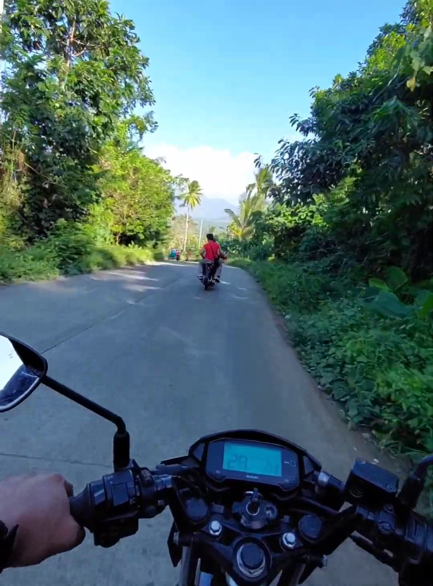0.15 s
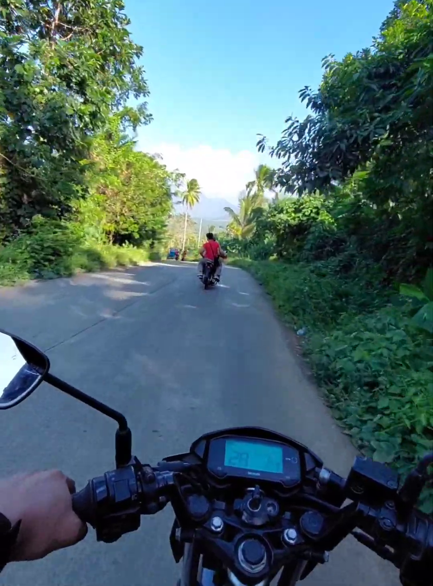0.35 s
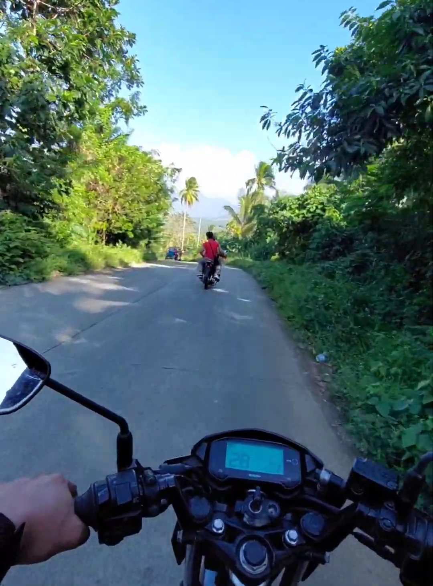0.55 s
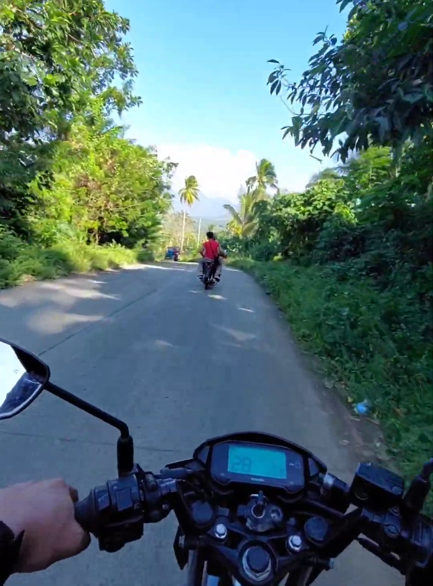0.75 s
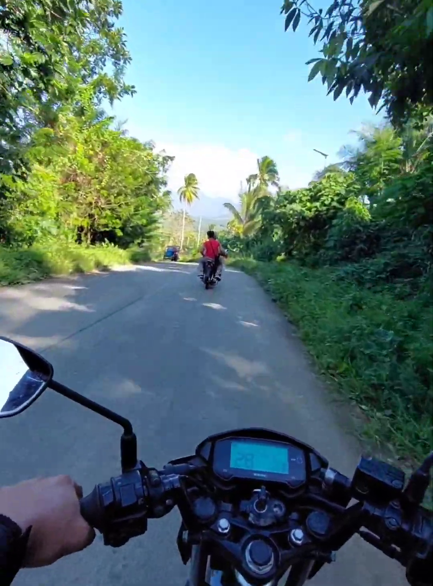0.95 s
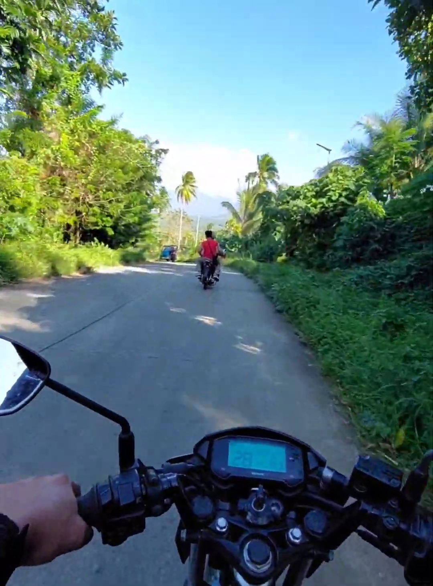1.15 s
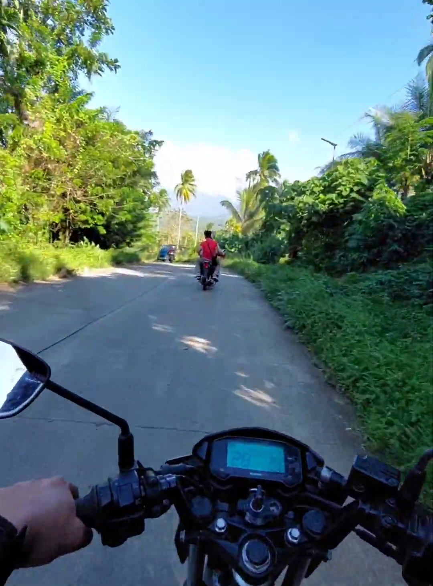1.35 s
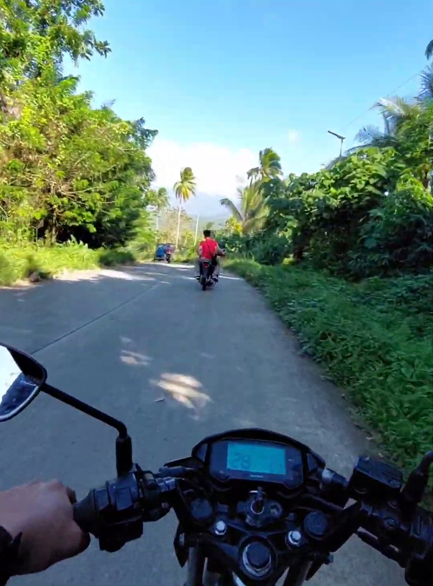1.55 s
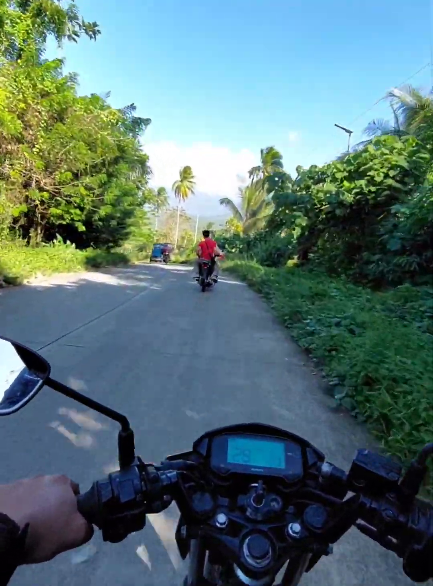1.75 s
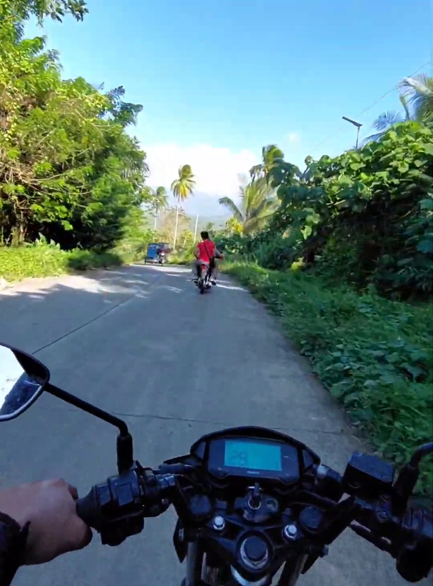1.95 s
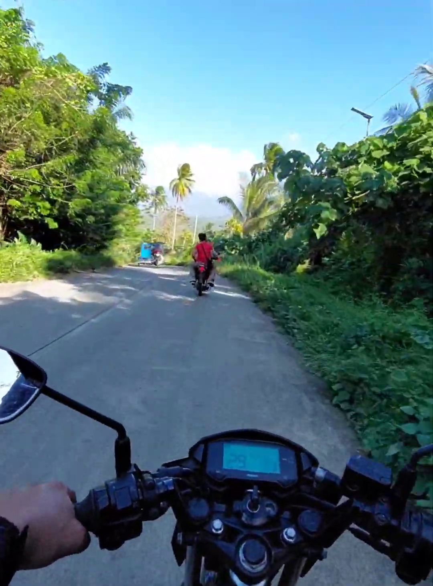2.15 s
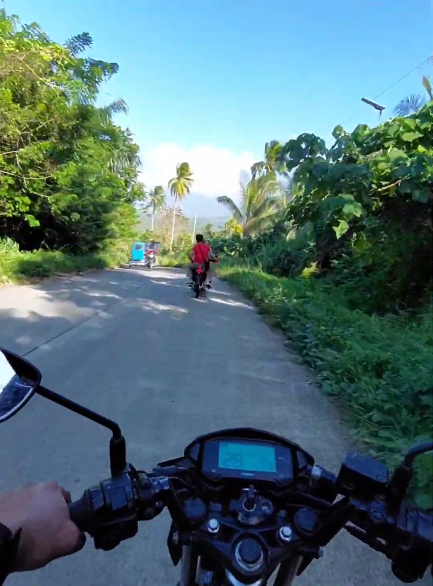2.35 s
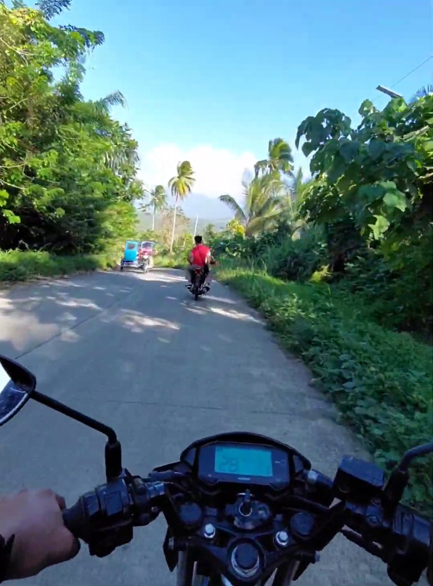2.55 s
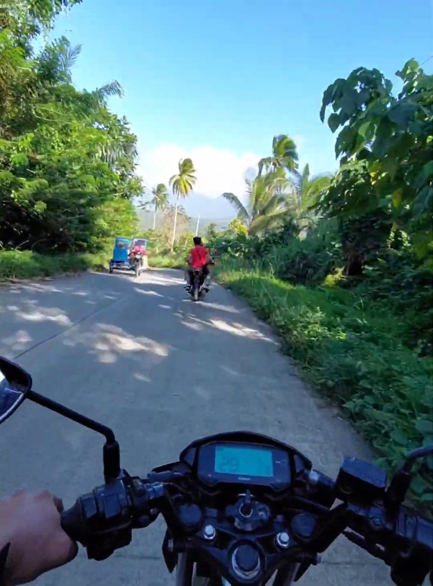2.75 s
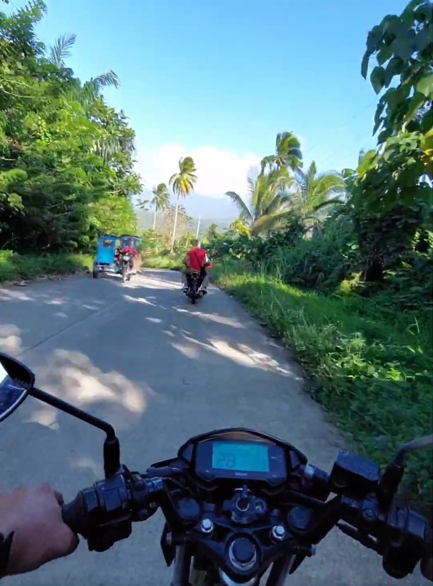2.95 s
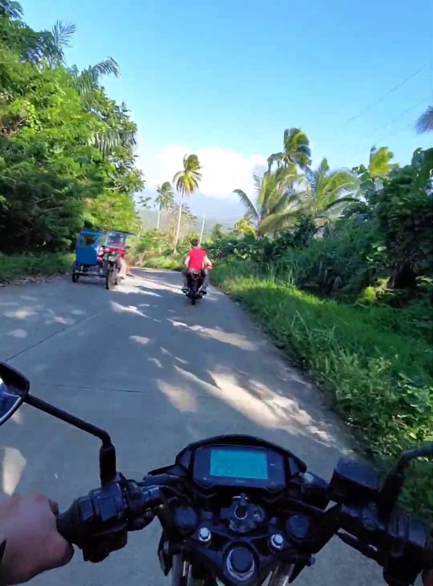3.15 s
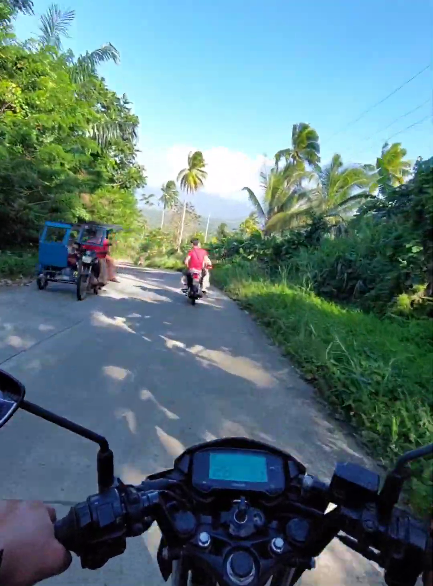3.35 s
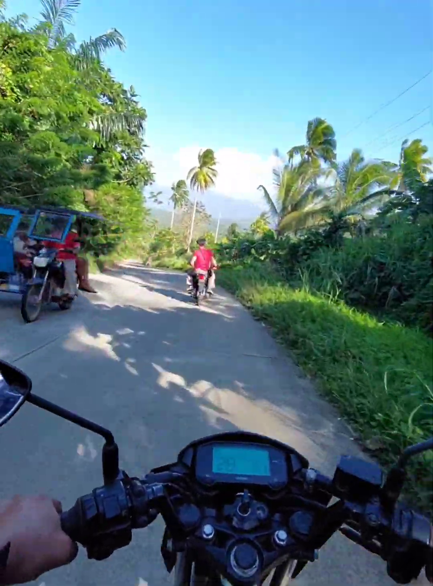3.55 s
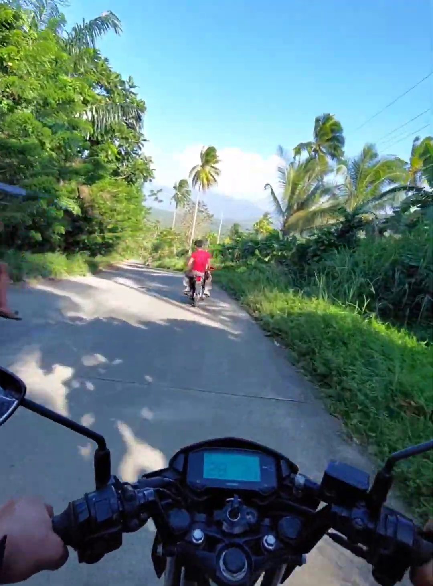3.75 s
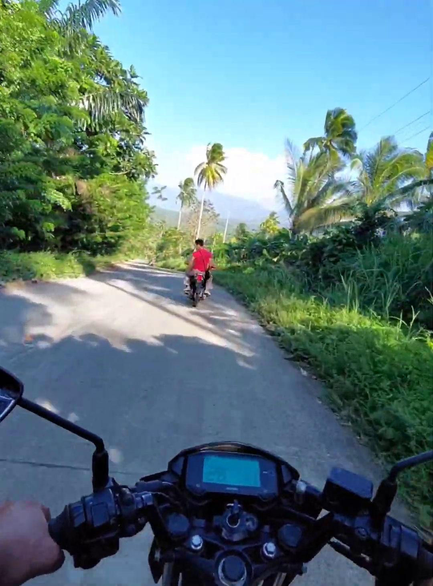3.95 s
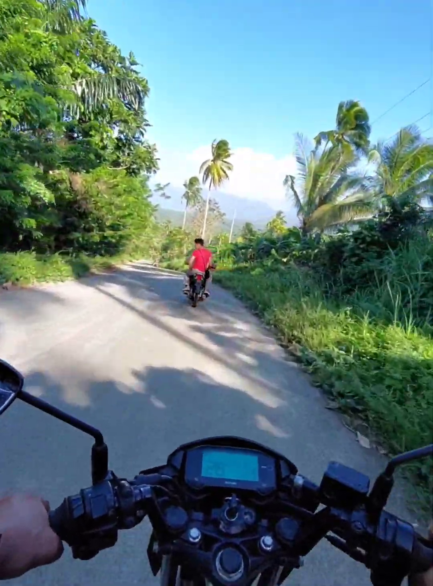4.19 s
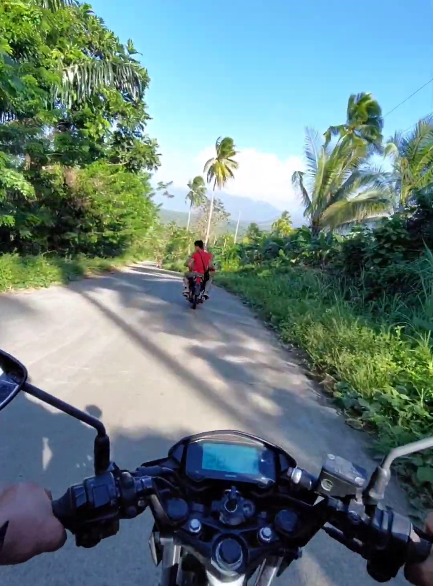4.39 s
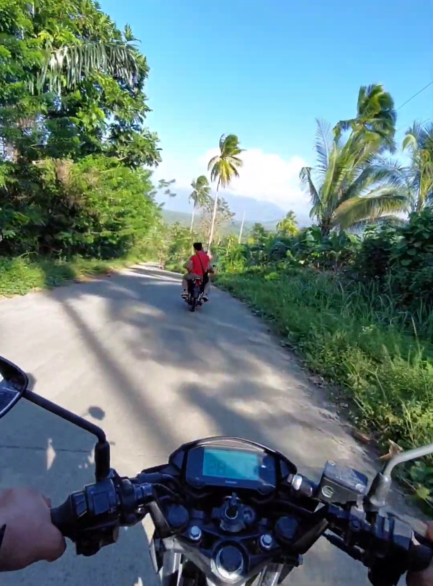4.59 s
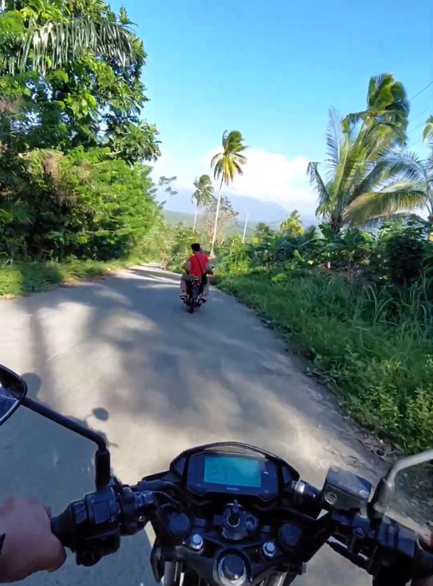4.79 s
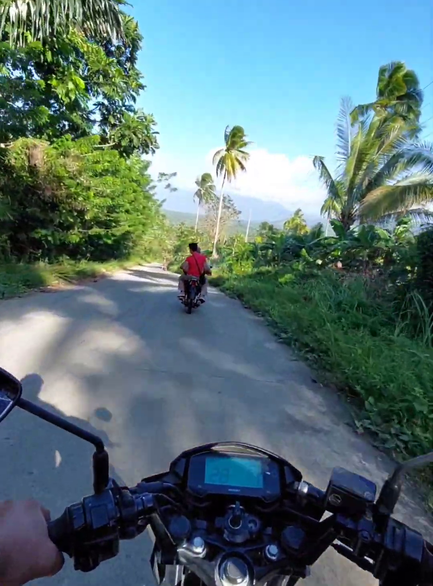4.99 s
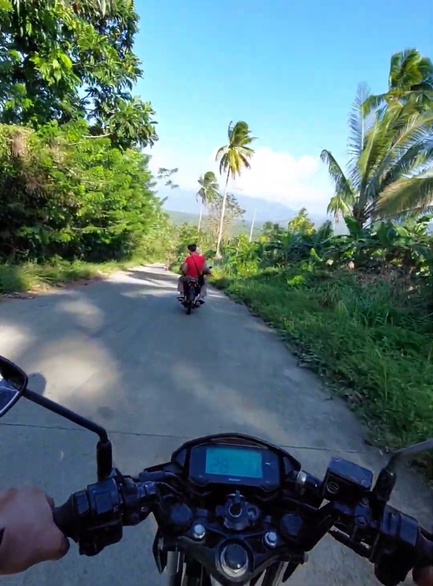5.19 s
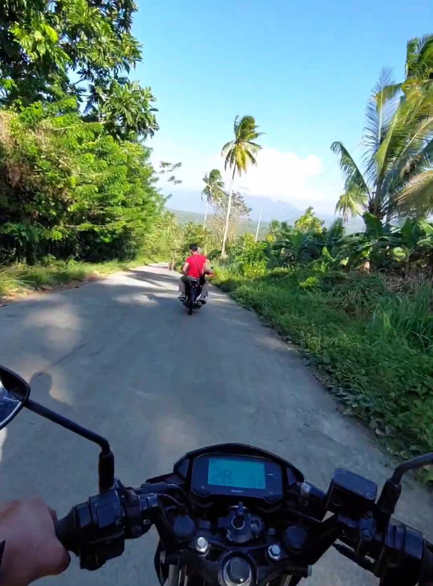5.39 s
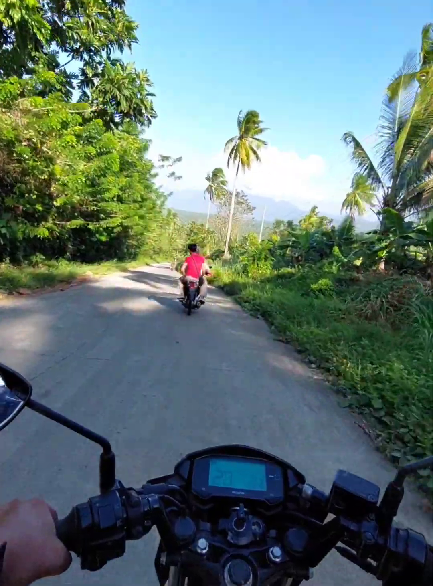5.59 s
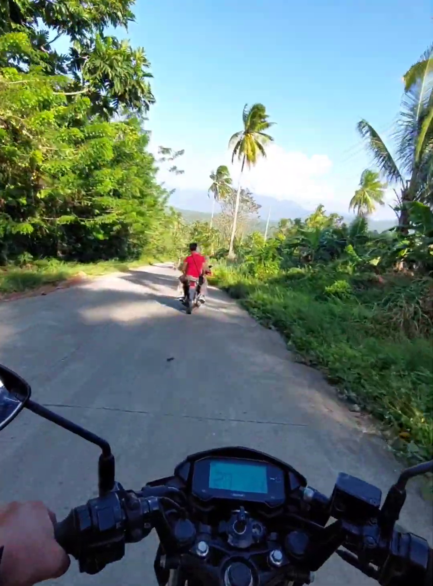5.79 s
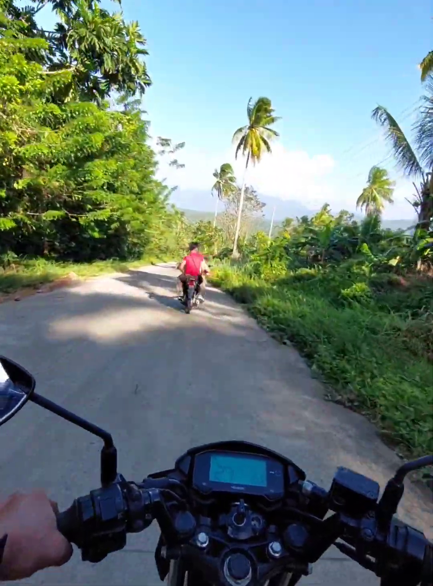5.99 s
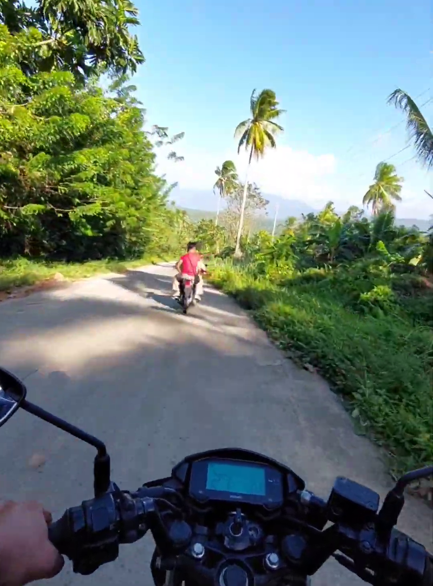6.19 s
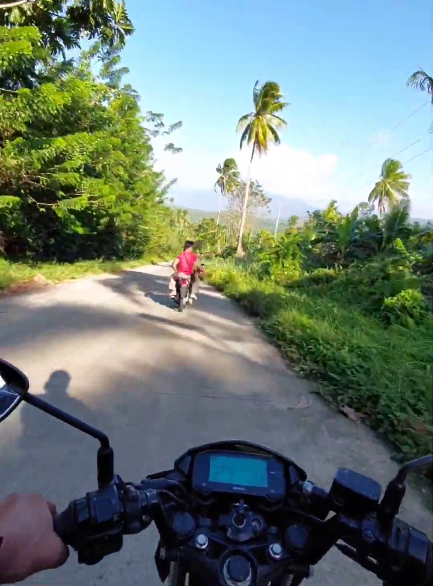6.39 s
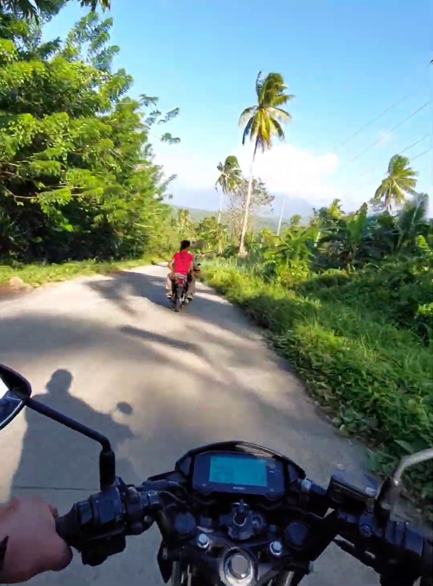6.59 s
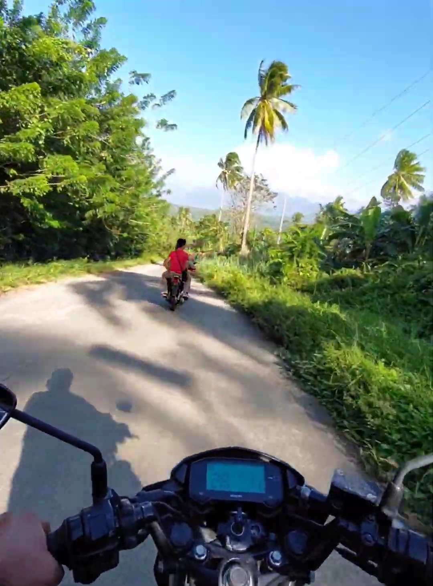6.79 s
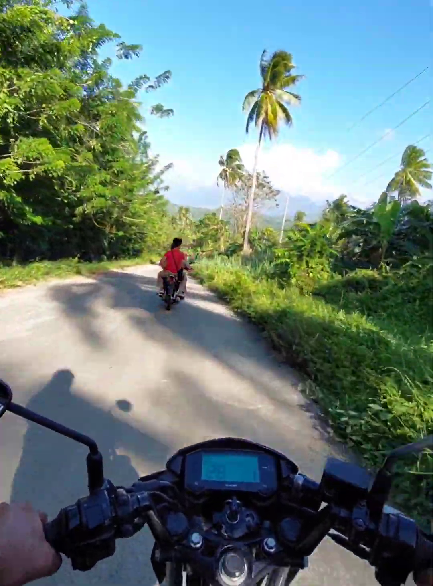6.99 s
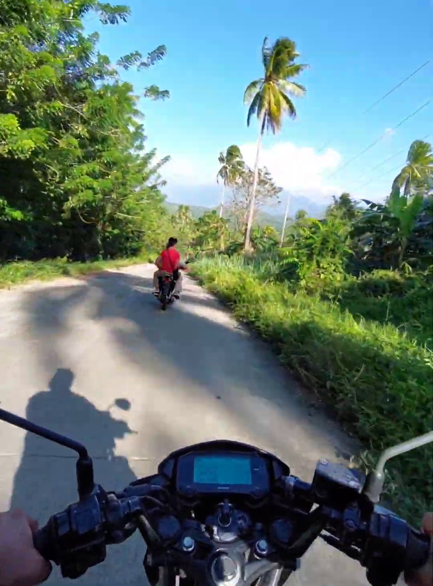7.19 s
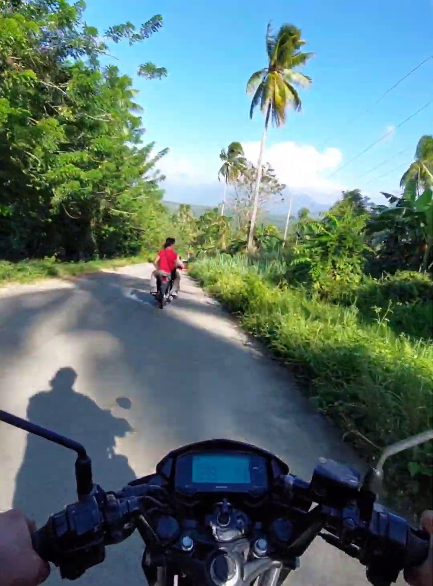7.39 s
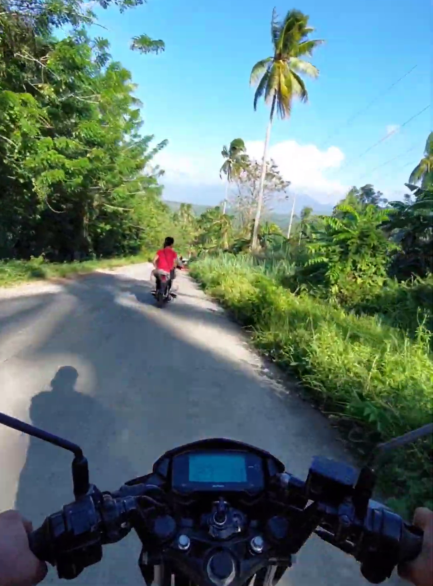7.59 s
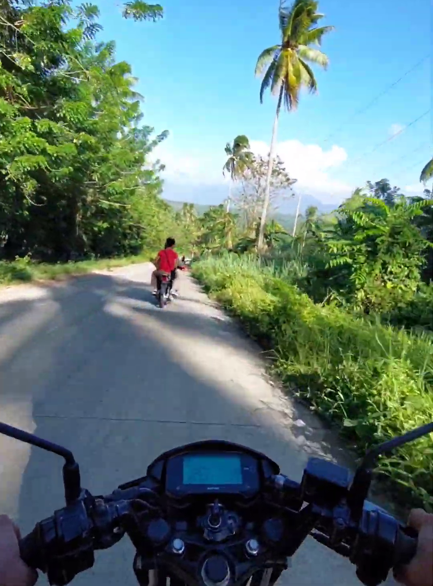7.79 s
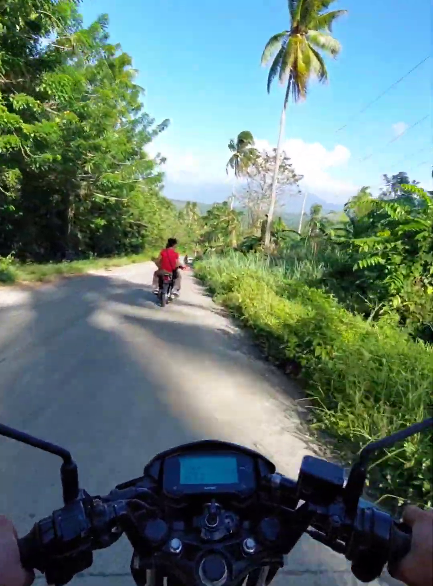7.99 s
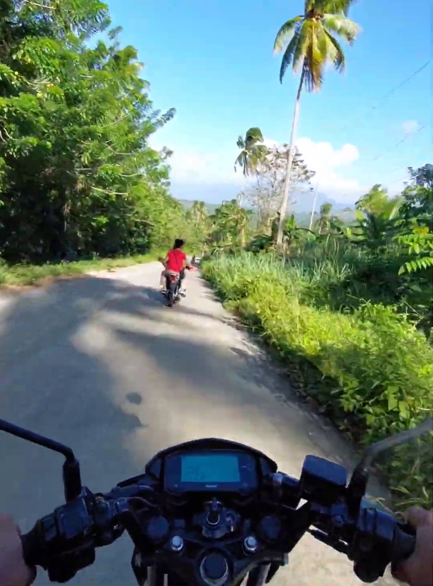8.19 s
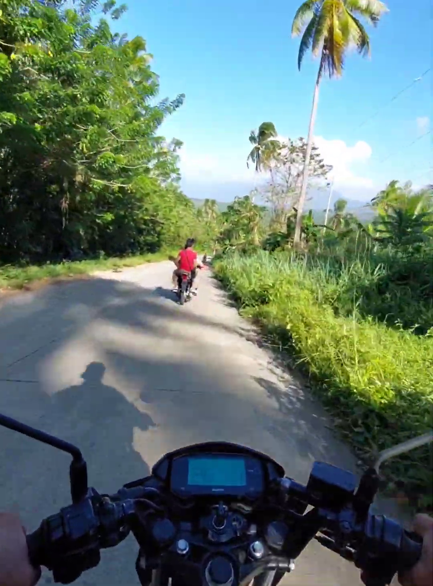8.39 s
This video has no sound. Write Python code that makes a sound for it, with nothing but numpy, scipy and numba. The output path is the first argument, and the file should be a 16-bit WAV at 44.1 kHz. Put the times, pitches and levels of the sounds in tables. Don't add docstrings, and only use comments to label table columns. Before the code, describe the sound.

Low, lumpy motorcycle thumping heard from the rear rider, with road-joint knocks and rattles, while an oncoming motor tricycle swells by and fades.

```python
import sys
import numpy as np
from scipy import signal
from scipy.io import wavfile
from scipy.ndimage import uniform_filter1d
from numba import njit

SR = 44100
rng = np.random.default_rng(int(sys.argv[2]) if len(sys.argv) > 2 else 0)


def amplitude_ratio(level_db):
    exponent = np.asarray(level_db, float) / 20
    return 10 ** exponent


def log_audio(samples):
    frames = np.atleast_2d(samples).T
    limited = np.clip(frames, -1, 1)
    pcm = np.round(limited * 32767).astype(np.int16)
    wavfile.write(sys.argv[1], SR, pcm)


N = 372195
T = np.arange(N) / SR
SLOW = T[::64]
BANDS_HZ = 14300 / 2 ** (np.arange(22)[::-1] / 2.5)
ZONE = np.digitize(BANDS_HZ, [950, 3000])

# time in seconds, firing rate in Hz.
OWN_RATE = [(-0.0004, 17.995), (0.4, 17.269), (0.8, 16.828), (1.4, 16.639), (2.4, 16.728), (3.2, 16.583),
            (4.2, 16.754), (5.2, 17.137), (6.0, 17.283), (6.8, 17.533), (7.5, 17.876), (8.0, 18.174),
            (8.44, 18.452)]
# time in seconds, firing rate in Hz.
AHEAD_RATE = [(-0.0083, 16.943), (1.0, 17.234), (2.0, 17.467), (2.3, 16.939), (2.8, 16.786), (3.3, 16.916),
              (4.3, 16.942), (4.9, 16.689), (5.3, 16.436), (5.7, 16.689), (6.3, 16.456), (6.7, 17.095),
              (7.1, 16.711), (7.4, 16.013), (7.8, 15.963), (8.1, 14.909), (8.44, 13.667)]
# time in seconds, exhaust level in dB, road level in dB.
RIDE_LEVELS = [(0, -15, -1.5), (.3, -14.5, 0.5), (.8, -13, 0.5), (1.25, -18, 1.5), (1.7, -18, 2), (2.2, -22, 2),
               (2.55, -32, 3), (2.75, -29.5, 0), (3.1, -28.5, 2.5), (4.2, -31.5, -1.5), (4.7, -33.5, -3),
               (5.1, -18.5, -3), (5.55, -22, -1.5), (5.9, -40, 0), (6.5, -13, 1), (7.0, -32, 0.5),
               (7.7, -32, 1.5), (8.44, -25.5, 2)]
# centre in Hz, width in Hz, level in dB.
OWN_PIPE = [(161, 39, 1), (76, 64, -3.5), (264, 230, -3), (368, 140, -0.5)]
# centre in Hz, width in Hz, level in dB.
AHEAD_PIPE = [(122, 82, 6.5), (77, 55, -4), (194, 620, -7)]
# centre in Hz, width in Hz, level in dB.
SILENCER = [(132.1, 34.8, -0.5), (75, 93, -3), (210, 130, -5)]
# time in seconds, peak in dB.
RICH_CHARGES = [(0.0024, -35), (0.0268, -16), (0.1, -17), (0.1464, -13), (0.2183, -6.5), (0.2646, -10),
                (0.3262, -9), (0.3829, -13), (0.4511, -11.5), (0.4978, -8), (0.568, -8.7), (0.615, -13),
                (0.6858, -8), (0.7332, -14), (0.759, -14), (0.7953, -8.5), (0.8245, -18), (0.85, -15),
                (0.8967, -19), (0.9272, -9.5), (0.9825, -10.5), (1.0352, -11), (1.0803, -20), (1.1057, -15.5),
                (1.1422, -11.3), (1.1966, -6.5), (1.2222, -8), (1.274, -13), (1.323, -12.3), (1.367, -11),
                (1.394, -12), (1.44, -9.5), (1.5122, -17), (1.545, -15.6), (1.5938, -12.6), (1.642, -19),
                (1.6629, -9.5), (1.7173, -13), (1.7746, -8), (1.814, -15), (1.8422, -8.5), (1.8822, -19),
                (1.908, -10), (2.008, -8), (2.062, -7.5), (2.1221, -8), (2.2457, -7.5), (2.3002, -7.5),
                (2.3607, -8.5), (2.4275, -14), (2.543, -5.5), (2.6022, -14.5), (2.7063, -17.3),
                (2.7338, -12.5), (2.8796, -13), (2.9355, -6.5), (2.9989, -16), (3.0619, -7.5),
                (3.0864, -16.2), (3.1126, -16),
                (3.1748, -9.5), (3.2446, -9.5), (3.3147, -10), (3.367, -7.5), (3.4186, -7.5), (4.7831, -8.5),
              (4.9805, -13), (5.0051, -14), (5.0497, -11.5), (5.0907, -11.5), (5.1575, -13.2),
              (5.2233, -15), (5.4564, -12), (5.509, -13.5), (5.573, -11.2), (5.6233, -9.5), (5.6966, -12),
              (5.8068, -11), (5.8852, -16.5), (5.9277, -8), (5.971, -14), (6.0427, -12), (6.1148, -7.5),
              (6.146, -17.6), (6.176, -12.5), (6.2024, -15), (6.2435, -16), (6.3174, -14), (6.354, -18.5),
              (6.4059, -19), (6.4627, -14), (6.4904, -15), (6.533, -10.5), (6.5913, -12), (6.732, -18),
              (6.7636, -12.5), (6.833, -12), (6.9604, -8.5), (7.121, -13.5), (7.2562, -13), (7.3042, -13),
              (7.3324, -16), (7.3729, -11), (7.4345, -12.5), (7.4614, -12.5), (7.572, -14), (7.748, -8),
              (7.816, -14), (7.9298, -10), (8.009, -11), (8.064, -10), (8.147, -9.5), (8.209, -10.5),
              (8.2852, -12), (8.3638, -9)]
# time in seconds, peak in dB.
SNAPS = [(0.1644, -15.5), (0.2934, -17), (0.3367, -12), (0.4542, -18), (0.631, -22), (0.757, -22),
         (0.9593, -19), (1.167, -21), (1.2869, -17), (1.467, -15), (1.5849, -15), (1.6458, -16),
         (1.7662, -14), (1.8286, -14), (1.954, -18), (2.0665, -20), (2.2442, -12.5), (2.3054, -27),
         (2.4867, -19.3), (2.5471, -19), (2.9047, -22), (2.918, -11.5), (2.938, -26), (3.0835, -16.5),
         (3.1601, -11.5), (3.272, -23), (3.29, -17), (3.3155, -16), (3.3426, -14.5), (3.3674, -18),
         (3.396, -17), (3.4218, -16.5), (3.448, -16), (3.498, -20), (5.169, -17), (6.0415, -16),
         (6.0987, -17), (6.1567, -13), (6.386, -25), (6.4437, -17), (6.5013, -18), (6.5203, -18),
         (6.539, -12.5), (6.5978, -17), (6.6172, -21), (6.7749, -14.5), (6.9585, -14), (7.019, -15.5),
         (7.1858, -19), (7.241, -17), (7.4092, -17), (7.8665, -16), (7.912, -15), (7.9676, -12),
         (8.2502, -18), (8.3026, -14)]
# frequency in Hz, density in dB per Hz.
ROAD = [(15, -45), (25, -7.5), (107, 5), (144, -12.5), (215, -10), (350, -17.5), (873, -34), (1240, -33),
        (1710, -32.5), (2070, -46.5), (2490, -45), (3740, -47), (5020, -39), (7940, -60.5), (15600, -51)]
# frequency in Hz, left-right likeness from 0 to 1.
LIKENESS = [(40, 1), (150, 0.57), (400, 0.53), (800, 0), (2500, 0), (7000, 0.16), (15000, 0)]
# centre in Hz, width in Hz, level
# over the rumble in dB, drift in dB/s.
HUMS = [(716.6, 39, -13, -0.58), (2418, 240, -27.5, -0.16), (6500, 3900, -35.5, 0.01),
        (1400, 130, -25, -0.1), (5200, 70, -50, 1), (340.5, 66, -11, 0.47), (873, 172, -13.5, -0.35),
        (494, 203, -10, -0.02), (12000, 2700, -37, 0.2)]
# start in seconds, length in seconds, gain in dB.
DUCKS = [
    (1.939, 0.056, -8.5),
    (2.583, 0.32, -5.5),
    (4.818, 0.17, -9),
    (5.231, 0.2, -18.5),
    (6.628, 0.073, -18),
    (7.0, 0.14, -3),
    (2.125, 0.096, -12),
    (6.848, 0.12, -5),
]
# time in seconds, peak in dB, brightness in Hz, T60 in seconds.
BUMPS = [(0.425, -26, 1210, 0.025), (1.444, -26.5, 1200, 0.049), (1.632, -28, 1200, .04),
         (1.903, -27.5, 1240, 0.043), (2.014, -25.5, 1200, 0.06), (2.641, -24.5, 1400, .05),
         (2.904, -32, 1190, .03), (4.779, -31, 1600, 0.03), (4.793, -32.5, 2110, 0.075),
         (5.007, -35, 1200, 0.023), (5.121, -24.5, 470, 0.14), (5.284, -24, 450, 0.28),
         (5.912, -37, 1200, 0.031), (6.401, -31, 1500, 0.036), (6.558, -37, 2500, 0.045),
         (6.609, -31, 2300, 0.049), (6.571, -34, 2400, 0.022), (6.621, -35, 2200, 0.03),
         (6.665, -40, 2400, 0.031), (6.695, -43, 3400, 0.063), (6.648, -28.5, 2460, 0.022),
         (6.9, -28, 1250, 0.026), (7.358, -37, 1200, 0.023), (5.312, -40.5, 5000, 0.067),
         (0.96, -21.5, 1190, 0.077), (1.131, -49, 1200, 0.079), (2.287, -28, 1180, 0.05),
         (2.733, -30.5, 1250, 0.28), (2.935, -23, 1510, 0.034), (4.808, -24.5, 1190, 0.097),
         (5.123, -33, 1170, 0.12), (5.182, -23, 880, 0.063), (5.279, -50, 700, 0.13),
         (5.312, -32, 1190, 0.12), (5.353, -20.5, 1140, 0.032), (5.335, -31, 1500, 0.033),
         (6.512, -24, 1130, 0.15), (6.544, -29.5, 1200, 0.18), (6.596, -23, 1190, 0.092),
         (6.638, -28, 1250, 0.026), (7.271, -21, 1190, 0.028)]
# time in seconds, peak in dB, centre in Hz, T60 in seconds.
PINGS = [(1.7624, -51, 4980, 0.023), (2.3015, -50, 5860, 0.03), (3.5398, -40, 5540, 0.023),
         (3.897, -38, 5070, 0.028), (3.916, -38.5, 4530, 0.11), (4.4857, -62, 5000, 0.024),
         (4.58, -52, 7600, 0.024), (4.635, -48, 4940, 0.03), (4.752, -52, 6800, 0.03),
         (6.915, -41, 4700, 0.034), (7.639, -45, 4220, 0.022), (1.214, -54, 4900, 0.02),
         (6.0616, -47, 5200, 0.022)]
# time in seconds, peak in dB, centre in Hz.
TICKS = [(0.8116, -46, 12800), (0.8889, -47, 14000), (1.1393, -48, 12700), (1.2141, -46, 11600),
         (2.2413, -50, 13100), (2.3007, -42, 13100), (2.8419, -45, 14000), (3.5389, -35, 12700),
         (3.897, -29.5, 11300), (4.4228, -49, 13700), (4.4867, -43, 14000), (5.4585, -57, 12400),
         (5.9204, -46, 12100), (6.0616, -48, 13200), (6.6702, -52, 13700), (6.791, -46, 13400),
         (7.1811, -51, 13500), (7.2938, -50, 11700), (7.639, -39, 14700), (7.6864, -45, 12000),
         (7.9633, -45, 11700), (8.2177, -43, 14500)]
# time in seconds, firing rate in Hz.
PASS_RATE = [(0, 38.1), (3.3, 38.2), (3.75, 39.25), (4.12, 38.8), (4.33, 38.05), (4.6, 38.3), (8.44, 38.2)]
# multiple of the rate, level in dB, lead of the peak in seconds.
PASS_ORDERS = [(1, -39, 0), (2, -8.5, -0.3), (3, 2.5, 0.21), (4, -7.5, 0.43), (5, -7, 0.52),
               (6, -13.5, 0.068), (7, -12.5, 0.026), (8, -14.5, 0.22), (9, -19.5, 0.079), (10, -24, 0.28),
               (11, -35, 0.2), (12, -24, 0.25)]
# time in seconds, level on the low orders in dB.
LOW_ORDERS = [(2.4, -20), (3.3, -17), (3.46, -16), (3.56, 3), (3.68, -3), (3.76, 0.5), (4.1, -0.5),
              (4.3, -0.5), (4.6, 1), (5.4, 2)]
# centre in Hz, width in Hz, level in dB.
BARK_PIPE = [(700, 60, 4), (799, 45, -1.5), (1060, 77, -2), (1264, 93, -3)]
# centre in Hz, width in Hz, level in dB.
INTAKE = [(1400, 100, 4.5), (1750, 94, 2.5)]
# centre in Hz, width in Hz, level relative to the running gear level in dB.
WHIRR = [(5470, 1500, -5), (12100, 2000, -7.5)]
# time in seconds, whine in Hz, whine level in dB, running gear level in dB.
GEARING = [(2.6, 3440, -76, -60), (3.05, 3440, -73, -58), (3.3, 3430, -54, -47), (3.5, 3400, -49, -48),
           (3.7, 3350, -53, -49), (3.85, 3310, -43, -48), (3.98, 3240, -62, -41), (4.12, 3260, -52, -46),
           (4.4, 3170, -53.5, -62), (4.65, 3150, -70, -68)]
# frequency in Hz, density in dB per Hz.
PASS_NOISE = [(240, -34), (400, 9.5), (419, -13), (705, 6), (1380, -23), (1820, -13), (2630, -19),
              (3310, -20), (8960, -30), (12600, -31), (15600, -32)]

RICH = RICH_CHARGES
# dB at road level 0, dB per dB of road level, drift in dB/s.
RUMBLE, ROAR, WIND = (-29.5, 0.88, 0), (-46, 1.42, -0.41), (-53.5, 1.17, 0)
CLOSING_M_S, ABEAM_S, LANE_M = 12, 3.92, 2.6
BOOM, SNARL = (0.35, -17, 1, -0.15, 0.5), (0, -23.5, 3.5, 0.6, -0.75)
BARK, RASP = (0, -35, 4.5, 0.9, -1), (0, -44.5, 7, 2.5, -1)
INTAKE_PART, RUSH = (0.49, -52, 21.5, 1.13, 11.5), (-2.1, -48, 6, 5, -1.5)
LOW_TYRE, HIGH_TYRE = (-0.29, -34.5, -2, 2.3, -1.5), (0.06, -39.5, 0.5, 0.7, -1.5)
PASS_HISS = (-0.1, -43.5, 1, 2.7, 1.5)


def to_rms(x, db=0):
    return x * (amplitude_ratio(db) / np.std(x[::5]))


def columns(rows):
    s, *values = np.transpose(rows)
    return [np.interp(SLOW, s, v) for v in values]


def full(slow):
    return np.interp(T, SLOW, slow)


def over_hz(points, hz):
    points_hz, values = np.transpose(points)
    return np.interp(np.log(hz), np.log(points_hz), values)


def walk(rate_hz):
    held = np.repeat(rng.standard_normal(int(rate_hz * N / SR) + 2), 8)
    smooth = uniform_filter1d(uniform_filter1d(held, size=8), size=8)
    return 1.3 * np.interp(SLOW * rate_hz * 8, np.arange(len(held)), smooth)


@njit
def svf(x, hz, width_hz):
    y, band, low = np.empty(len(x)), 0., 0.
    g, k = np.tan(np.pi * hz / SR), width_hz / hz
    for i in range(len(x)):
        v = (band + g * (x[i] + 1e-18 - low)) / (1 + g * (g + k))
        band, low, y[i] = 2 * v - band, low + 2 * g * v, k * v
    return y


def resonance(x, hz, width_hz, second_width_hz):
    return svf(svf(x, float(hz), float(width_hz)), float(hz), float(second_width_hz))


def narrow(hz, width_hz):
    return to_rms(resonance(rng.standard_normal(N), hz, width_hz, 2 * width_hz))


def late(x, delay_s):
    return np.interp(T - delay_s, T, x)


def ports(x, lag_ms, pan_db):
    return np.array([late(x, lag_ms / 1000) * amplitude_ratio(pan_db / 2), x * amplitude_ratio(-pan_db / 2)])


def clicks(times_s, sizes):
    at = (times_s * SR).astype(int)
    ok = (at >= 0) & (at < N)
    return np.bincount(at[ok], sizes[ok], N)


def decay(pushes, t60_s):
    return signal.lfilter([1], [1, -amplitude_ratio(-60 / (t60_s * SR))], pushes)


def ring(pushes, pipe, push_ms):
    puffs = signal.lfilter([1], [1, -np.exp(-1000 / (push_ms * SR))], pushes)
    return sum(amplitude_ratio(db) * resonance(puffs, hz, w, 4 * w) * 100 / w for hz, w, db in pipe)


def firings(rate):
    start_s, start_hz = rate[0]
    turns = np.cumsum(full(columns(rate)[0])) / SR - start_s * start_hz
    return np.interp(np.arange(1, int(turns[-1]) + 1), turns, T)


def charge(at_s, spread):
    gap_s = at_s[:, None] - np.transpose(RICH)[0] - .01
    near = np.exp(-(gap_s / .034) ** 4).sum(axis=1)
    scatter_db, displaced_db = 1.5, -16
    return scatter_db * spread + displaced_db * np.minimum(near, 1)


def ducking():
    edge_s = 0.0068
    return sum(db * np.clip(np.minimum(SLOW - s, s + length_s - SLOW) / edge_s, 0, 1)
               for s, length_s, db in DUCKS)


def own_bike(exhaust_db, wind_db):
    at_s = firings(OWN_RATE)
    chance = rng.standard_normal((len(at_s), 4)).T
    blows = clicks(at_s + 0.00026 + 0.00029 * chance[0], -amplitude_ratio(charge(at_s, chance[1])))
    returns = clicks(at_s + .0138 + 0.00057 * chance[2], -.8 * amplitude_ratio(charge(at_s, chance[3])))
    pushes = blows + returns
    thump = to_rms(ring(pushes, OWN_PIPE, push_ms=0.57), -6)
    gas = to_rms(decay(np.abs(pushes), .09) * narrow(374, 316), -12)
    ringing = -amplitude_ratio(-11.5 - 600 * T) * np.cos(2 * np.pi * 152 * T)
    exhaust = (thump + gas) * full(amplitude_ratio(exhaust_db)) + ringing
    scatter_db = 3.5 * np.tanh(rng.standard_normal(len(at_s)))
    ticks = clicks(at_s - .003, amplitude_ratio(scatter_db))
    rasp = uniform_filter1d(decay(ticks, 0.047), size=260)
    tick = decay(ticks ** 1.1, 0.023)
    valves = to_rms(rasp * narrow(4900, 3100), -7) + to_rms(tick * narrow(12100, 2400), -15)
    return ports(exhaust, 0.36, -1.3) + ports(valves * full(amplitude_ratio(wind_db)), 0.029, -0.23)


def bike_ahead(exhaust_db):
    at_s = firings(AHEAD_RATE)
    chance = rng.standard_normal((len(at_s), 4)).T
    strong_weak_db = 0.73 * (-1) ** np.arange(len(at_s))
    blows_db = strong_weak_db + charge(at_s, chance[1])
    returns_db = -4.5 + strong_weak_db + charge(at_s, chance[3])
    blows = clicks(at_s - .012 + 0.0023 * chance[0], amplitude_ratio(blows_db))
    returns = clicks(at_s + 0.0029 + 0.00076 * chance[2], amplitude_ratio(returns_db))
    thump = to_rms(ring(blows + returns, AHEAD_PIPE, push_ms=2.0), -6)
    return ports(thump * full(amplitude_ratio(exhaust_db)), 0.29, -1.9)


def band_gains(spectrum, low_db, mid_db, high_db):
    tops = amplitude_ratio(over_hz(spectrum, BANDS_HZ)) * np.sqrt(BANDS_HZ)
    shares = [t / np.linalg.norm(tops[ZONE == z]) for t, z in zip(tops, ZONE)]
    return [amplitude_ratio(db) for db in (low_db, mid_db, high_db)], shares


def hiss(sources, lag_ms, swell_db, flicker_db):
    common, side, swell = np.zeros((3, N)), np.zeros(N), walk(12)
    noise = rng.standard_normal((2, N))
    duck_db = ducking()
    for k, (hz, z) in enumerate(zip(BANDS_HZ, ZONE)):
        power = sum((zones[z] * shares[k]) ** 2 for zones, shares in sources)
        band_db = -11 * (hz < 190) + 0.24 * duck_db * (hz < 210) + swell_db * swell
        band_db = band_db + flicker_db * min(1, (1500 / hz) ** .5) * walk(22)
        gain = full(np.sqrt(power) * amplitude_ratio(band_db))
        like = np.clip(over_hz(LIKENESS, hz), 0, 1)
        alike, apart = (to_rms(resonance(np.roll(n, 9973 * k), hz, hz / 2.4, hz / 2.4)) * gain
                        for n in noise)
        common[z] += np.sqrt((1 + like) / 2) * alike
        side += np.sqrt((1 - like) / 2) * apart
    low = svf(side, 300., 4200.)
    opposed = np.array([[1], [-1]])
    ahead = common[2] + (side - low) * opposed
    return ahead + ports(common[0] + common[1], lag_ms, -1.1) + ports(low, lag_ms, -1.0) * opposed


def hums(rumble_db):
    hum = sum(full(amplitude_ratio(rumble_db + db + fade_db_s * SLOW)) * narrow(hz, w)
              for hz, w, db, fade_db_s in HUMS)
    return ports(hum, 0.31, -0.88)


def buffet():
    return np.array([narrow(67, 40) * full(amplitude_ratio(-40 + 3.6 * walk(6.6))) for _ in range(2)])


def booms():
    def boom(at_s, size):
        pushes = clicks(at_s, -size) + clicks(at_s + 0.00775, -1.05 * size)
        return ring(pushes, SILENCER, push_ms=0.8)

    s, db = np.transpose(RICH)
    unit = np.abs(boom(np.zeros(1), np.ones(1))).max()
    return ports(boom(s + .003, amplitude_ratio(db - 3.5)) / unit, 0.38, -1.2)


def snaps():
    s, db = np.transpose(SNAPS)
    age_ms, width_ms = np.arange(-200, 201) / SR * 1000, 0.5
    rebound = 0.33 * np.exp(-.5 * (age_ms / (3.5 * width_ms)) ** 2)
    drop = rebound - 1.28 * np.exp(-.5 * (age_ms / width_ms) ** 2)
    return ports(signal.fftconvolve(clicks(s, amplitude_ratio(db + 2)), drop, "same"), 0.15, -1.1)


def knocks():
    out, age_s = np.zeros((2, N + SR)), T[:SR // 4]
    rise = 1 - np.exp(-age_s / 0.0028)

    def noise():
        return rng.standard_normal(len(age_s))

    def add(s, burst):
        start = int(s * SR)
        out[:, start:start + len(age_s)] += burst

    for s, db, hz, t60_s in BUMPS:
        f = 0.46 * hz
        shake = np.array([to_rms(resonance(noise(), f, f, f), 0.39) for _ in range(2)])
        shake = shake + to_rms(svf(svf(noise(), 350., 210.), 335., 200.), -5.5)
        crack = np.exp(-age_s / .0016) * np.sin(2 * np.pi * 0.62 * hz * age_s)
        add(s, rise * amplitude_ratio(db - 60 * age_s / t60_s) * shake - amplitude_ratio(db + 2) * crack)
    for s, db, hz, t60_s in PINGS:
        ping = to_rms(resonance(noise(), hz, hz / 6, hz / 6), 1)
        ping += to_rms(svf(noise(), 12600., 2500.), -13)
        add(s, amplitude_ratio(db - 60 * age_s / t60_s) * ping)
    for s, db, hz in TICKS:
        tick = to_rms(resonance(noise(), hz, hz / 5, hz / 4))
        add(s, amplitude_ratio(db - 3.5 - 60 * age_s / 0.016) * tick)
    return out[:, :N]


def nearing(part):
    after_s, db, front_db, loss_db_m, beyond_m = part
    along_m, lane_m = CLOSING_M_S * (SLOW - ABEAM_S - after_s), LANE_M + beyond_m
    r_m = np.hypot(along_m, lane_m)
    return db - 20 * np.log10(r_m / lane_m) - front_db * along_m / r_m - loss_db_m * (r_m - lane_m)


def pass_exhaust():
    turns = np.cumsum(full(columns(PASS_RATE)[0] * (1 + 0.0026 * walk(17)))) / SR
    fires_s = np.interp(np.arange(int(turns[-1])) + np.interp(4.078, T, turns) % 1, turns, T)
    barks = clicks(fires_s, amplitude_ratio(2.5 * np.tanh(rng.standard_normal(len(fires_s)))))
    sound = to_rms(ring(barks, BARK_PIPE, push_ms=0.097)) * full(amplitude_ratio(nearing(BARK)))
    buzz = 1 + 0.43 * np.cos(2 * np.pi * turns)
    sound += buzz * narrow(1830, 350) * full(amplitude_ratio(nearing(RASP)))
    start_s, end_s = 2.4, 5.4
    span = slice(int(start_s * SR), int(end_s * SR))
    edge = np.clip(np.minimum(SLOW - start_s, end_s - SLOW) / .2, 0, 1)
    drop_db = -12 * np.clip((SLOW - 4.8) / 0.03, 0, 1)
    low_orders_db = columns(LOW_ORDERS)[0]
    order_db = {k: db for k, db, _ in PASS_ORDERS}
    for k, db, lead_s in PASS_ORDERS:
        part, top = (BOOM, 3) if k < 7 else (SNARL, 7)
        db = db - order_db[top] + nearing((part[0] - lead_s, *part[1:]))
        db = db - 3 * (k != 3) + low_orders_db * (k < 5)
        size = np.sqrt(2) * np.interp(T[span], SLOW, edge * amplitude_ratio(db + drop_db + 1.5 * walk(15)))
        sound[span] += size * np.sin(2 * np.pi * k * turns[span] + 0.2987 * k * k)
    return sound


def pass_gear():
    whine_nominal_hz = 3320
    whine_hz, whine_db, gear_db = columns(GEARING)
    gears = sum(full(amplitude_ratio(db + 3 * walk(24.63))) * narrow(hz, w) for hz, w, db in WHIRR)
    trip_s = np.hypot(CLOSING_M_S * (T - ABEAM_S), LANE_M) / 343
    sound = late(gears, trip_s) * full(amplitude_ratio(gear_db))
    intake = sum(amplitude_ratio(db) * narrow(hz, w) for hz, w, db in INTAKE)
    sound += intake * full(amplitude_ratio(nearing(INTAKE_PART) - 9 + 0.25 * walk(8.6)))
    read_s = np.cumsum(full(whine_hz / whine_nominal_hz)) / SR
    whine = np.interp(read_s, T, narrow(whine_nominal_hz, 150))
    sound += whine * full(amplitude_ratio(whine_db + 1.5 * walk(20)))
    return sound + narrow(2800, 1200) * full(amplitude_ratio(nearing(RUSH) + 1.2 * walk(12)))


def spring_squeak():
    start_s, end_s, start_hz, end_hz, db = 4.352, 4.4, 2120, 2260, -46
    part = np.clip((T - start_s) / (end_s - start_s), 0, 1)
    turns = np.cumsum(start_hz + (end_hz - start_hz) * part) / SR
    return amplitude_ratio(db) * np.sin(np.pi * part) * np.sin(2 * np.pi * turns)


def three_wheeler():
    return ports(pass_exhaust() + pass_gear(), 0.06, -1.4) + spring_squeak()


def scene():
    exhaust_db, road_db = columns(RIDE_LEVELS)
    exhaust_db = exhaust_db + ducking()
    rumble_db, roar_db, wind_db = (db + share * road_db + drift_db_s * SLOW
                                   for db, share, drift_db_s in (RUMBLE, ROAR, WIND))
    ahead_db = exhaust_db + 4.5 + 0.93 * walk(2.4)
    bikes = own_bike(exhaust_db, wind_db) + bike_ahead(ahead_db)
    road = band_gains(ROAD, rumble_db + 6.5, roar_db - .7, wind_db - .4)
    passing = band_gains(PASS_NOISE, nearing(LOW_TYRE) + 1.7, nearing(HIGH_TYRE), nearing(PASS_HISS))
    air = hiss([road, passing], lag_ms=0.26, swell_db=0.95, flicker_db=2.5)
    engine = bikes + booms() + snaps() + hums(rumble_db)
    return engine + air + buffet() + knocks() + three_wheeler()


def band_limit(x):
    return signal.sosfilt(signal.butter(12, 15710, fs=SR, output="sos"), x)


def record(dry):
    high_pass = signal.butter(2, 36, "high", fs=SR, output="sos")
    heard = signal.sosfilt(high_pass, dry)
    return band_limit(np.tanh(1.18 * heard) / 1.039)


dry = scene()
out = record(dry)
log_audio(out)
```